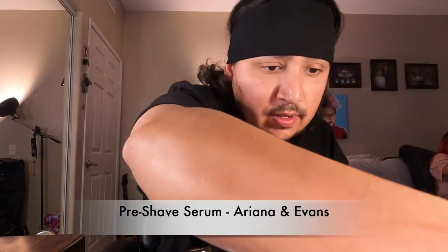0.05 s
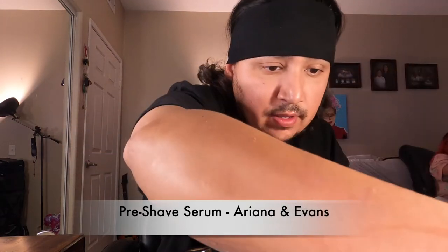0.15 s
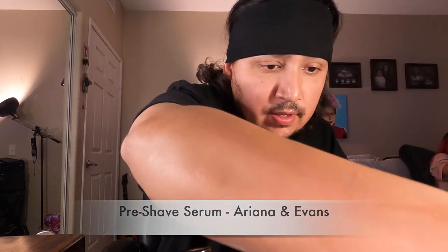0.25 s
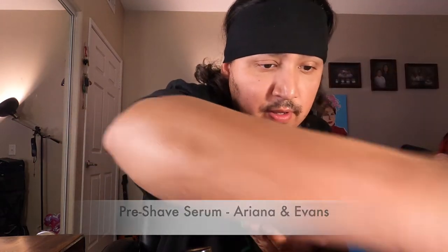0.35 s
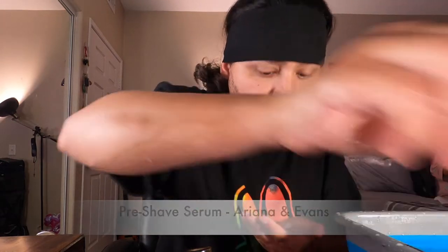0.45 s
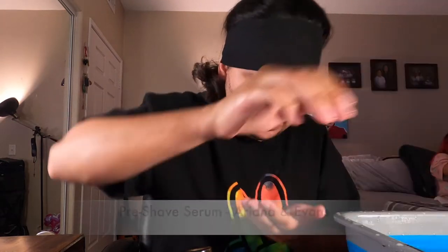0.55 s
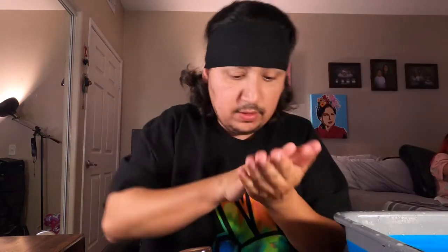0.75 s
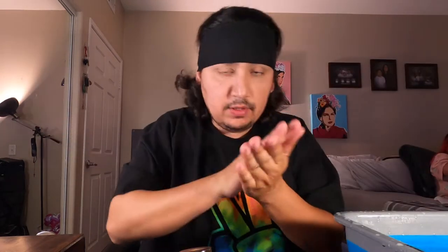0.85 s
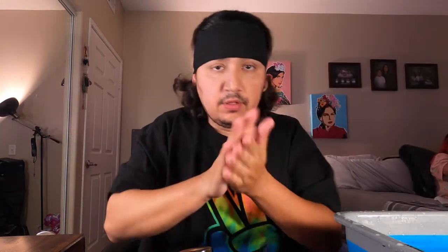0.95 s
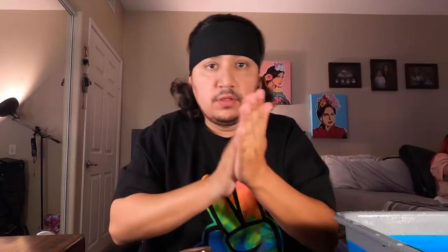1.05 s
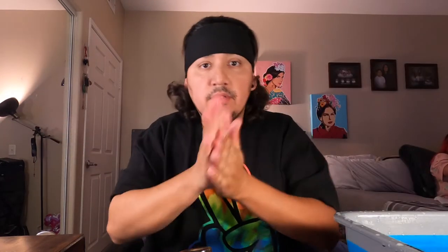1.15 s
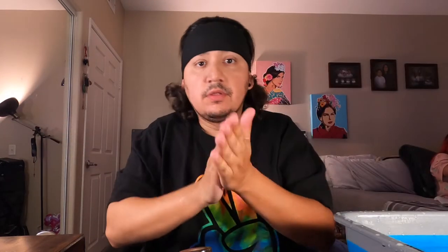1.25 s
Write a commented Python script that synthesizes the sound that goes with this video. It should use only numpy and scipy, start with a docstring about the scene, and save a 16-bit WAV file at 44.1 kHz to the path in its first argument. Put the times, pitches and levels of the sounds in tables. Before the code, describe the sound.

A small glass bottle lands on a desk at about 0.1 seconds with one loud, dull thump and a faint glassy ring. Softer bumps and faint scrapes follow until 0.5 seconds, booming low through the desk to the microphone in a small bedroom. After a brief lull, from 0.8 to about 1.4 seconds, wet palms rub together in quick, much quieter strokes, with tiny sticky clicks around one second.

```python
"""Glass bottle on a desk, wet palms

A small glass bottle is set down on the desk that carries the microphone: one dull thump, then softer
bumps and faint scrapes as it is let go. Two palms wet with serum meet and rub in quick strokes, with
tiny sticky clicks. A small bedroom booms at its low resonances."""
import sys
import numpy as np
from scipy import signal
from scipy.fft import rfft, irfft, next_fast_len
from scipy.io import wavfile
from scipy.ndimage import uniform_filter1d, minimum_filter1d

SR = 44100
rng = np.random.default_rng(int(sys.argv[2]) if len(sys.argv) > 2 else 0)


def wrap_up_sound(samples):
    """Save the sound to the file named by the first command line argument, as 16-bit audio."""
    columns = np.atleast_2d(samples).T
    # keep every value between -1 and 1, then stretch to whole-number steps
    tamed = np.clip(columns, -1, 1)
    steps = np.round(tamed * 32767).astype(np.int16)
    wavfile.write(sys.argv[1], SR, steps)


N = 57330
TOP_HZ = 15350


# bumps: t/s, level/dB, thud f/Hz, boom/dB, contact noise/dB, softness/s
BUMPS = [(0.102, -28, 495, -30, -30, 0.0012), (.1115, -11, 466.7, -22.5, -24.5, 0.0054),
         (0.1235, -2, 310.2, 3, -9, 0.00041), (.139, -17.5, 354, -6, -25, .002),
         (0.176, -13.5, 230, -5.5, -23.5, 0.0041), (0.211, -19, 367, -4, -30, .003),
         (0.227, -23, 324, -11.5, -12, 0.0017), (0.259, -15, 375, 4, -22, 0.0015),
         (0.2644, -23.5, 200.5, -9, -28, 0.00052), (.29, -28, 244, -4, -9.5, 0.0039),
         (0.332, -27, 235, 7, -20.5, 0.0011), (0.364, -16.5, 322, 3, -37, 0.001),
         (0.414, -12.5, 273, -3, -22.5, 0.0075), (.473, -12, 333, -0.5, -18, 0.006)]
# desk and room modes: f/Hz, level/dB
BOOM_MODES = [(125, -49.5), (159, -22), (194, -20.5), (238, -18), (283, -23.5), (368, -18), (415, -17.5),
              (510, -18), (622, -25.5)]
# their decay: f/Hz, t60/s
BOOM_DECAY = [(125, .3), (160, .32), (240, .36), (285, .32), (365, .14), (620, .11)]
# contact noise: f/Hz, level/dB
CONTACT_SPECTRUM = [(60, -25.5), (200, 10.5), (500, -3), (1000, 3.5), (1500, -11.5), (2200, -15.5),
                    (3200, -24.5), (5000, -31.5), (8000, -52), (14000, -64)]

def desk_bumps():
    """Each bump: a thud damped by the hand, slower flex of the desk top, low boom, contact noise."""
    thud_s, settle_s, flex_hz = 0.0083, 0.0057, 177.4
    modes = [(hz, db, along(BOOM_DECAY, hz)) for hz, db in BOOM_MODES]
    out = np.zeros(N)
    for s, db, hz, boom_db, contact_db, soft_s in BUMPS:
        t = since(s)
        sharp = 0.77 * amp(2 * db)  # a hard blow starts sharp and settles
        cycles = hz * (t + sharp * settle_s * (1 - np.exp(-t / settle_s)))
        envelope = (1 - np.exp(-t / 0.00013)) * np.exp(-(t / thud_s) ** 2)
        punch = 1 + 0.65 * amp(db)  # harder blows put more into the thud
        thud = punch * envelope * np.sin(2 * np.pi * cycles)
        flex = amp(-2) * struck(t, rise_s=0.0024, t60=0.045) * np.sin(2 * np.pi * flex_hz * t)
        contact = amp(contact_db) * noise(CONTACT_SPECTRUM) * struck(t, rise_s=0.00028, t60=0.039)
        boom = amp(boom_db) * ring(t, modes, rise_s=0.013)
        out += amp(db) * (1 - np.exp(-t / soft_s)) * (thud + flex + boom + contact)
    return out


# edge strikes: t/s, level/dB, f/Hz
CLACKS = [(.1222, -14.5, 1080), (.263, -26, 520), (.273, -22, 440), (.362, -29, 520), (.376, -25, 480),
          (.411, -33, 830), (.48, -33, 740)]
# modes of a strike: frequency ratio, level/dB
CLACK_MODES = [(.78, -4), (0.998, -1), (1.37, -1.5)]

def edge_clacks():
    """The bottle's edge catches the wood: brief clusters of modes."""
    wood = np.zeros(N)
    for s, db, hz in CLACKS:
        modes = [(hz * ratio, mode_db, 0.019) for ratio, mode_db in CLACK_MODES]
        wood += amp(db) * ring(since(s), modes, rise_s=0.002)
    return wood


def peak_click():
    """A brief high click, like overload, at the loudest thump's peak."""
    return amp(-34) * band_noise(5500, octaves=0.51) * struck(since(0.1263), rise_s=0.0002, t60=0.002)


# bottle modes: f/Hz, level/dB, t60/s
GLASS_MODES = [(780, -36, .13), (890, -31, .06), (1513, -27, .085), (2283, -44, .13), (3946, -40, .2),
               (4064, -48, .2), (5297, -56, .3), (6670, -56, .15), (6799, -60, .22)]

def glass_ring():
    """Low modes ring at once; high ones swell as the fingers let go, beating against close twins."""
    strike_s, let_go_s, swell_s, split_hz = 0.1245, 0.007, 0.0076, 3400
    lower = [mode for mode in GLASS_MODES if mode[0] < split_hz]
    upper = [mode for mode in GLASS_MODES if mode[0] >= split_hz]
    twins = [(hz * 1.0052, db - 4.5, t60) for hz, db, t60 in upper]
    body = ring(since(strike_s), lower, rise_s=0.0015)
    t_free = since(strike_s + let_go_s)
    high = ring(t_free, upper, swell_s) - ring(t_free, twins, swell_s)
    return body + high + amp(-11.5) * room(high)


# slides: start/s, end/s, rise/s, fall/s, level/dB, ring/dB, rasp/dB
SCRAPES = [(0.048, 0.105, 0.05, 0.026, -55, -14.5, 1.5), (0.124, 0.31, 0.036, 0.073, -52.5, -11, -3),
           (0.398, 0.468, 0.04, 0.064, -55.5, -8.5, -6)]
# dull body: f/Hz, level/dB
SCRAPE_SPECTRUM = [(300, -14.5), (700, -4.5), (1000, -0.5), (1550, -1.5), (1900, -6), (2300, -8.5),
                   (3300, -15), (6000, -25), (14000, -64)]
# high resonances: f/Hz, width/oct, level/dB
SCRAPE_RING = [(3773, 0.1, 5.5), (4830, 0.075, 4), (7600, 0.033, -10.5)]
# low resonances: f/Hz, width/oct, level/dB
SCRAPE_RASP = [(1450, 0.069, 1), (1854, 0.083, -4.5)]

def bottle_scrapes():
    """The bottle slides into place: dull friction noise with narrow resonances."""
    out, t = np.zeros(N), since(0)
    for start, end, rise_s, fall_s, db, ring_db, rasp_db in SCRAPES:
        swell = np.exp(np.minimum(t - start, 0) / rise_s - since(end) / fall_s)
        body = noise(SCRAPE_SPECTRUM)
        ringing = amp(ring_db) * peak_noise(SCRAPE_RING)
        rasp = amp(rasp_db) * peak_noise(SCRAPE_RASP)
        out += amp(db) * swell * (body + ringing + rasp)
    return out


# strokes: peak t/s, rise/s, fall/s, level/dB, hollow f/Hz
STROKES = [(0.83, 0.03, 0.04, -61, 1770), (.945, 0.039, 0.047, -56.5, 1415),
           (0.974, 0.015, 0.014, -53.5, 5800), (1.058, 0.027, 0.028, -54.5, 2470),
           (1.112, 0.081, 0.022, -56.5, 6400), (1.157, 0.017, 0.041, -53, 2780),
           (1.277, 0.035, 0.079, -51, 2320)]
# skin friction: f/Hz, level/dB
SKIN_SPECTRUM = [(100, -20.5), (400, -8.5), (700, -6.5), (1250, 1.5), (2000, -2), (3400, -3.5),
                 (4300, -2.5), (4850, -3), (5600, -9), (7400, -9), (8000, -16.5), (8700, -13.5),
                 (10500, -19.5), (12500, -23), (15000, -63.5)]

def palm_strokes():
    """Each stroke swells and fades: hiss and wet grains, coloured by the hollow between the hands."""
    hollow_db, hollow_oct = 10, 0.42
    out, t = np.zeros(N), since(0)
    for s, rise_s, fall_s, db, hollow_hz in STROKES:
        friction = rng.standard_normal(N) + amp(-4) * wet_grains(hollow_hz)
        colour = lambda hz: amp(along(SKIN_SPECTRUM, hz) + hollow_db * bell(hz, hollow_hz, hollow_oct))
        from_peak = np.abs(t - s) / np.where(t < s, rise_s, fall_s)
        hiss = unit(filtered(friction, colour)) * np.exp(-0.5 * from_peak ** 2)
        light_contact = amp(-3.5) * noise(SKIN_SPECTRUM) / np.cosh(from_peak)
        out += amp(db) * (hiss + light_contact)
    return out


def wet_grains(centre_hz, per_s=1100, range_db=24, spread_oct=1.2, t60_cycles=10):
    """Tiny bursts of the wet film, each a few cycles at its own pitch; rms 1."""
    when, pitch, faintness = rng.random((int(per_s * N / SR), 3)).T[:, :, None]
    t = np.arange(SR // 100) / SR
    hz = np.minimum(centre_hz * 2 ** (spread_oct * (2 * pitch - 1)), TOP_HZ)
    bursts = amp(-range_db * faintness) * struck(t, 1 / hz, t60_cycles / hz) * np.sin(2 * np.pi * hz * t)
    indices = (when * N).astype(int) + np.arange(len(t))
    return unit(np.bincount(indices.ravel(), bursts.ravel(), N)[:N])


# film snaps: t/s, relative level/dB, f/Hz, width/oct, t60/s
CLICKS = [(0.803, -58, 7460, .12, .012), (0.98, -28.5, 4810, 0.056, 0.0071),
          (1.021, -46, 2300, 0.29, 0.012), (1.082, -46.5, 1400, 0.091, .016),
          (1.0867, -25, 6270, 0.43, 0.0054), (1.187, -42, 3070, 0.77, 0.015)]

def sticky_clicks():
    """The liquid film snaps as the palms part."""
    return sum(2 * amp(db) * struck(since(s), 0.0019, t60) * band_noise(hz, octaves)
               for s, db, hz, octaves, t60 in CLICKS)


# rumble envelope: t/s, level/dB
RUMBLE_LEVEL = [(0, -52.5), (.1, -50), (.55, -68), (.7, -87), (.8, -63), (.94, -54), (1.0, -57.5),
                (1.12, -55.5), (1.3, -55.5)]
# rumble colour: f/Hz, level/dB
RUMBLE_SPECTRUM = [(25, -21.5), (85, -26.5), (118, -8), (165, 0), (215, -9), (275, -3.5), (330, -21),
                   (420, -10.5), (700, -35.5), (2000, -51)]

def hand_rumble():
    """Dull rumble of the moving hands."""
    db = np.interp(since(0), *np.transpose(RUMBLE_LEVEL))
    return amp(db) * noise(RUMBLE_SPECTRUM)


# bedroom decay: f/Hz, t60/s
ROOM_DECAY = [(150, 0.8), (500, 0.24), (2000, 0.21), (6000, 0.093), (12000, 0.23)]

def room(x):
    """Room tail of x, each frequency dying at its own rate."""
    hz, t, spectra = signal.stft(rng.standard_normal(SR // 2), SR, nperseg=256)
    decay = struck(t + 0.0028, rise_s=0.0042, t60=along(ROOM_DECAY, hz)[:, None])
    tail = signal.istft(spectra * decay, SR, nperseg=256)[1]
    return signal.fftconvolve(x, tail / np.linalg.norm(tail))[:N]


# background: f/Hz, level/dB
FLOOR_SPECTRUM = [(25, -27), (85, -15.5), (125, 2.5), (260, -1.5), (500, -15), (800, -17.5), (1400, -13.5),
                  (3000, -25.5), (6000, -35.5), (10000, -46.5), (14000, -58)]

def noise_floor():
    """Faint, steady, mostly low noise."""
    return amp(-57.5) * noise(FLOOR_SPECTRUM)


def amp(db):
    """Decibels to gain."""
    return 10 ** (np.asarray(db) / 20)


def unit(x):
    """Scale to rms 1."""
    return x / np.sqrt(np.mean(x ** 2) + 1e-20)


def along(points, hz):
    """Interpolate (f/Hz, value) points on a log axis."""
    f, values = np.transpose(points)
    return np.interp(np.log(hz + 1), np.log(f + 1), values)


def since(s):
    """Seconds since s, zero before it."""
    return np.maximum(np.arange(N) / SR - s, 0)


def filtered(x, response):
    """Apply a frequency response to x."""
    size = next_fast_len(N + SR // 4)
    return irfft(rfft(x, size) * response(np.fft.rfftfreq(size, 1 / SR)), size)[:N]


def bell(hz, centre_hz, octaves):
    """Gaussian hump on a log-frequency axis."""
    return np.exp(-0.5 * (np.log2((hz + 1) / centre_hz) / octaves) ** 2)


def noise(spectrum):
    """Noise shaped by (f/Hz, level/dB) points; rms 1."""
    return unit(filtered(rng.standard_normal(N), lambda hz: amp(along(spectrum, hz))))


def peak_noise(peaks):
    """Noise in (f/Hz, width/oct, level/dB) peaks; rms 1."""
    response = lambda f: sum(amp(db) * bell(f, hz, octaves) for hz, octaves, db in peaks)
    return unit(filtered(rng.standard_normal(N), response))


def band_noise(hz, octaves):
    """Noise in one peak; rms 1."""
    return peak_noise([(hz, octaves, 0)])


def struck(t, rise_s, t60):
    """Quick rise, exponential fall."""
    return (1 - np.exp(-t / rise_s)) * np.exp(-np.log(1000) * t / t60)


def ring(t, modes, rise_s):
    """Decaying (f/Hz, level/dB, t60/s) modes with 1 dB of level scatter."""
    return sum(amp(db + rng.normal(0, 1)) * struck(t, rise_s, t60) * np.sin(2 * np.pi * hz * t)
               for hz, db, t60 in modes)


def scene():
    """Desk, bottle and hands in the room."""
    desk_low_hz, airborne_hz = 112, 583  # the desk radiates little below the first, freely above the second
    wall_s = 0.014
    low_cut = signal.butter(3, desk_low_hz, "high", fs=SR, output="sos")
    knocks = signal.sosfilt(low_cut, desk_bumps() + edge_clacks() + peak_click())
    echo = amp(-15.5) * filtered(knocks, lambda hz: np.exp(-2j * np.pi * hz * wall_s))
    rub, snaps = palm_strokes(), sticky_clicks()
    handling = bottle_scrapes() + hand_rumble()
    airborne = filtered(knocks, lambda hz: hz ** 2 / (hz ** 2 + airborne_hz ** 2))
    tails = amp(-5) * room(airborne) + amp(-10) * room(rub + snaps / 2)
    return (knocks + glass_ring() + echo + rub + snaps + handling + tails + noise_floor())[None]


def record(dry):
    """A limiter holds the thump down; the microphone dulls the top and cuts off at TOP_HZ."""
    ceiling_db, window_s, rolloff_hz = -0.6, 0.003, 13200
    size = int(window_s * SR)
    needed = np.minimum(1, amp(ceiling_db) / (np.abs(dry[0]) + 1e-9))
    gain = uniform_filter1d(minimum_filter1d(needed, 2 * size + 1), size)
    return filtered(dry[0] * gain, lambda hz: (hz < TOP_HZ) / (1 + (hz / rolloff_hz) ** 14))[None]


dry = scene()
out = record(dry)
wrap_up_sound(out)
```